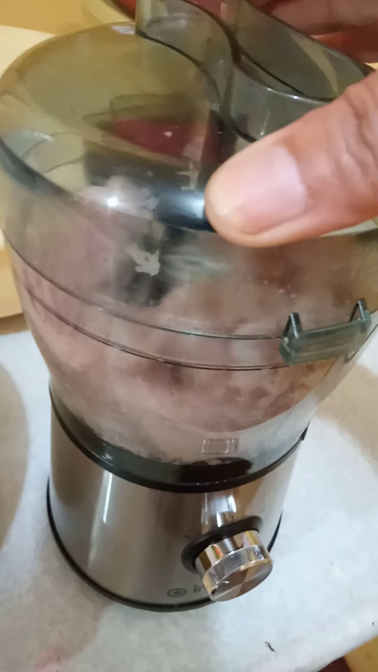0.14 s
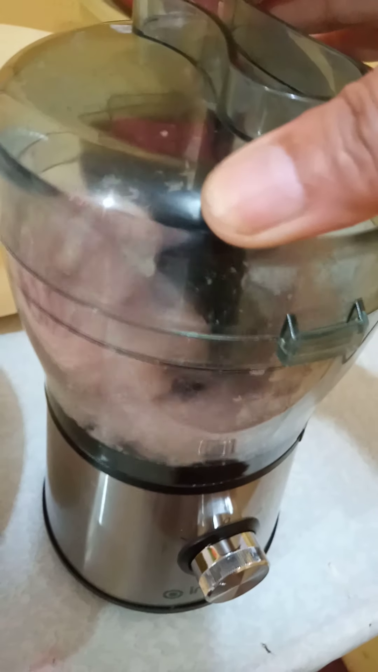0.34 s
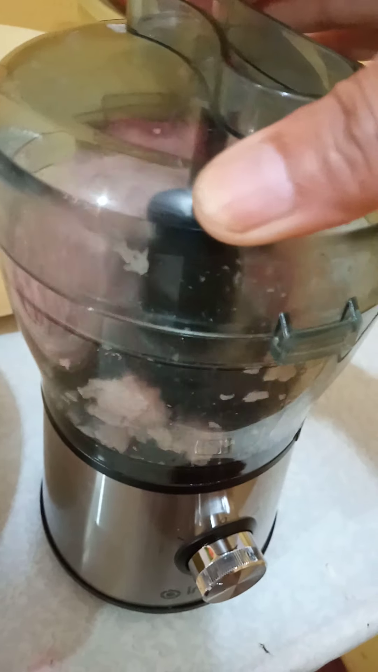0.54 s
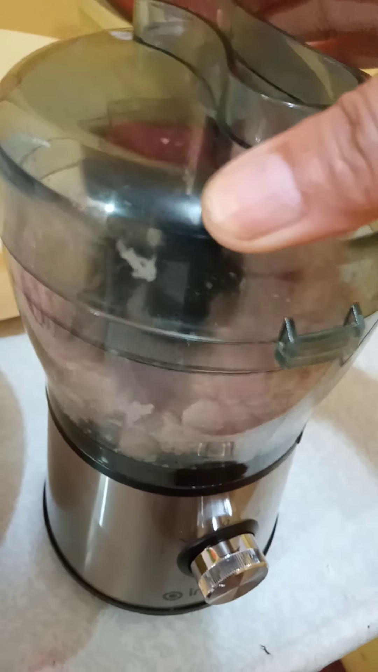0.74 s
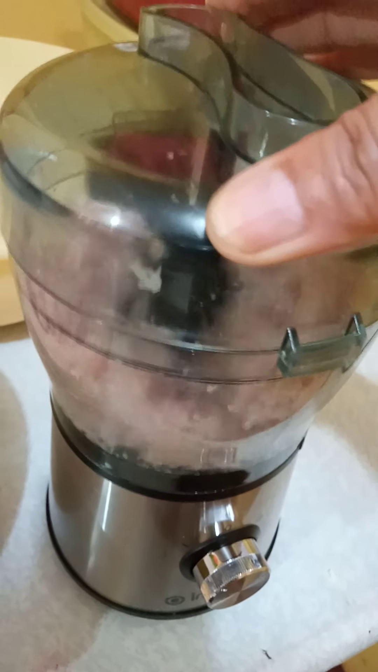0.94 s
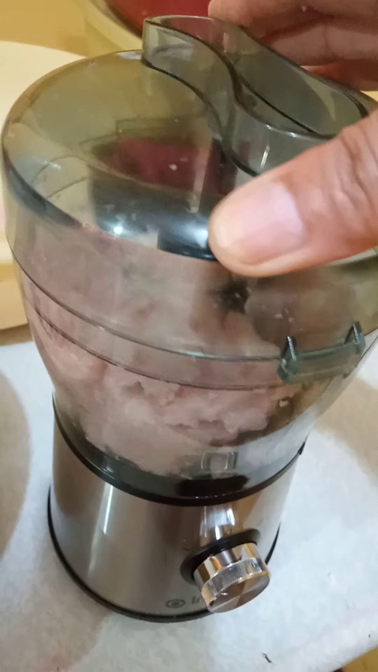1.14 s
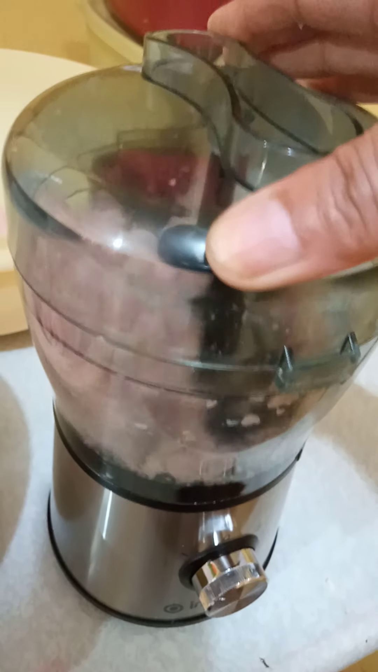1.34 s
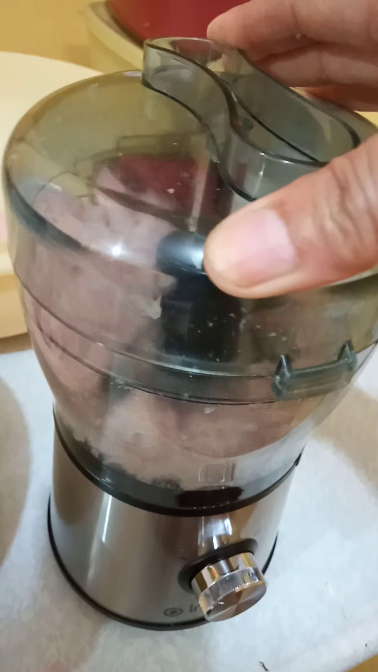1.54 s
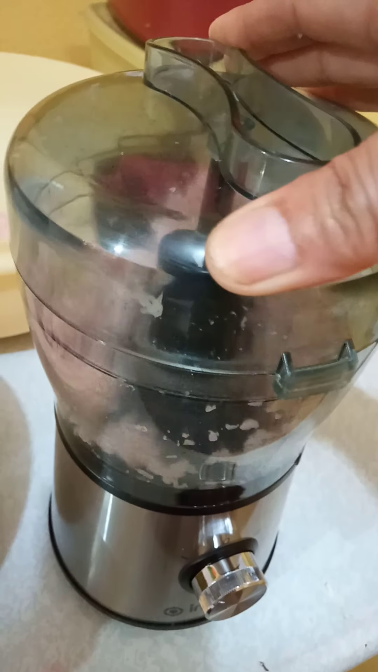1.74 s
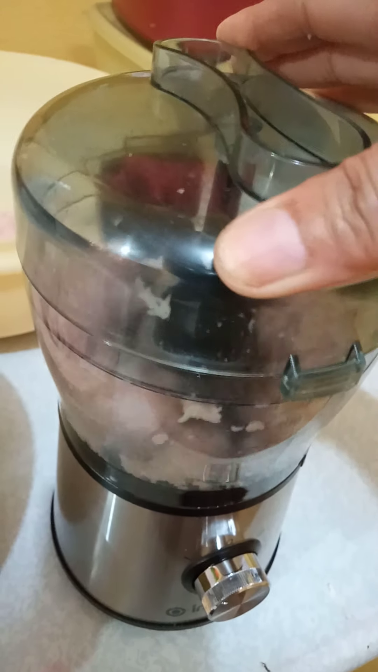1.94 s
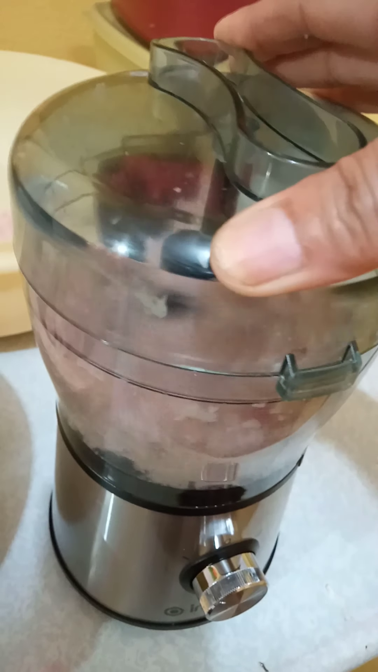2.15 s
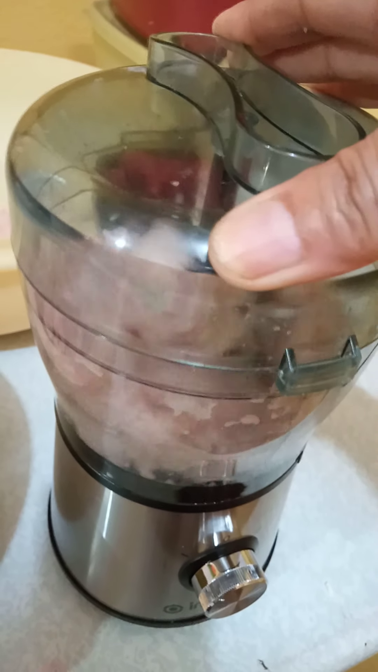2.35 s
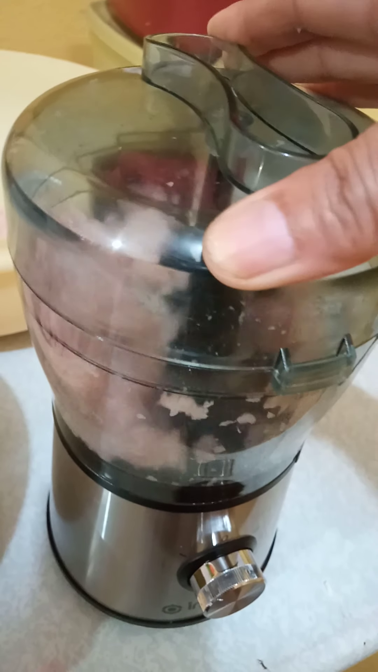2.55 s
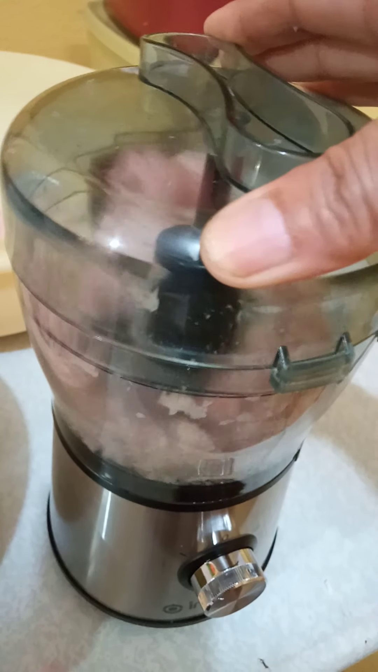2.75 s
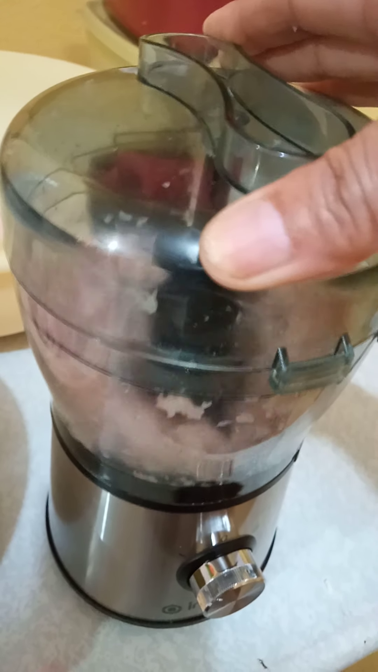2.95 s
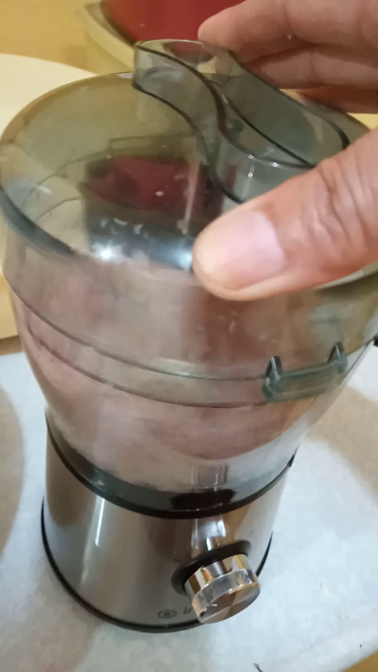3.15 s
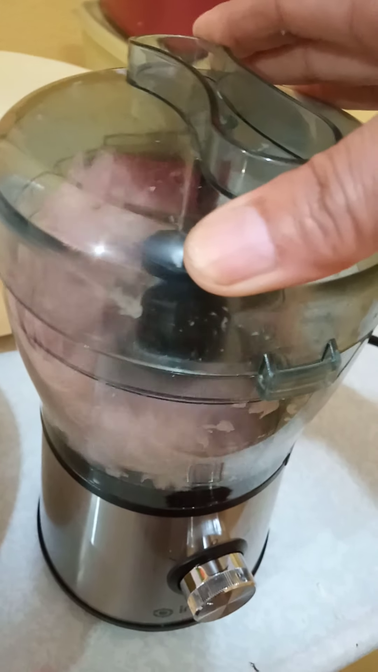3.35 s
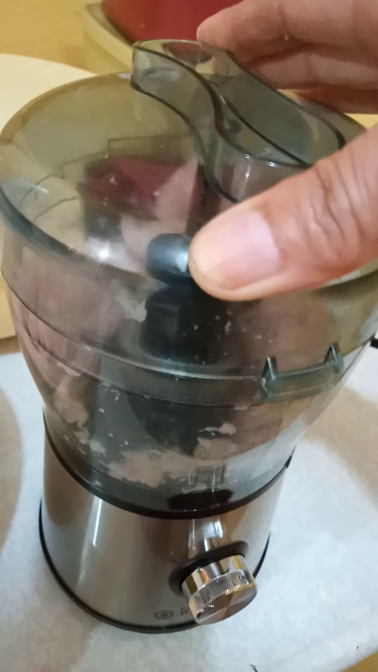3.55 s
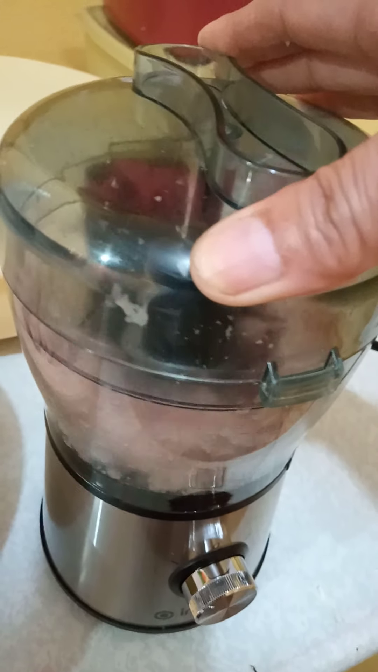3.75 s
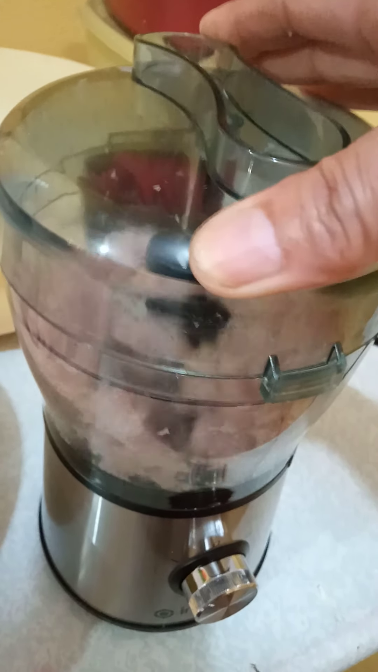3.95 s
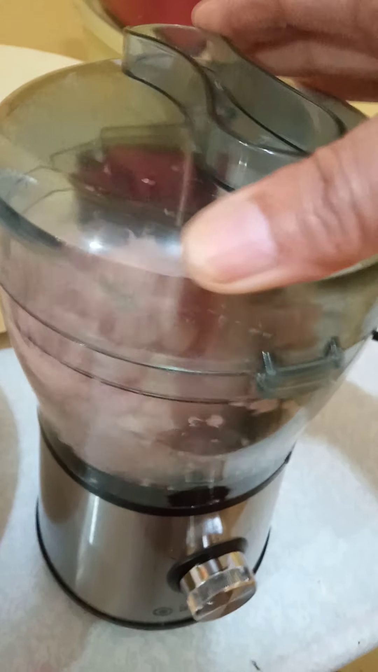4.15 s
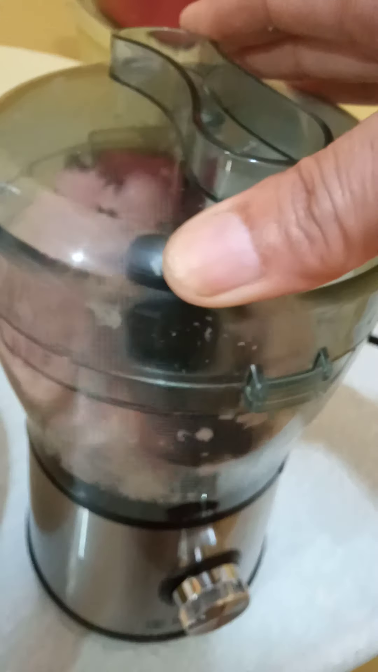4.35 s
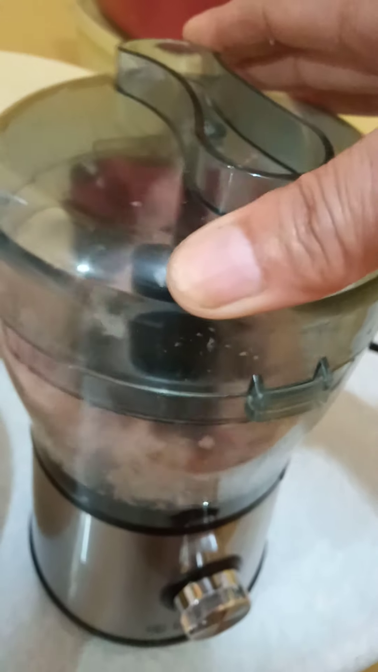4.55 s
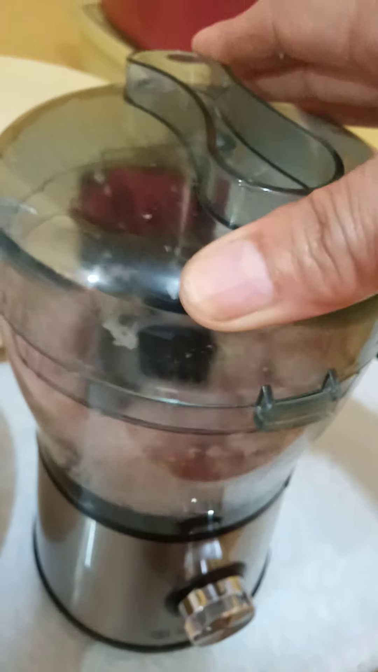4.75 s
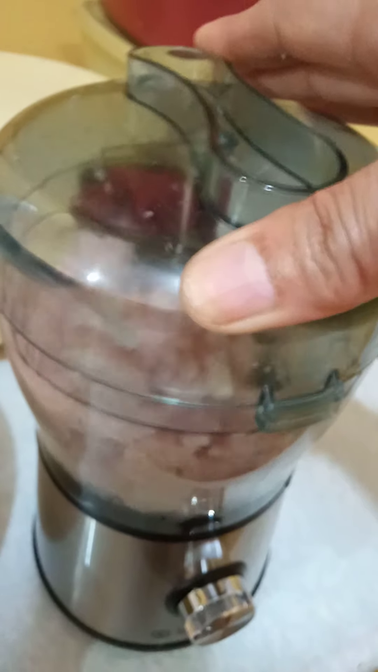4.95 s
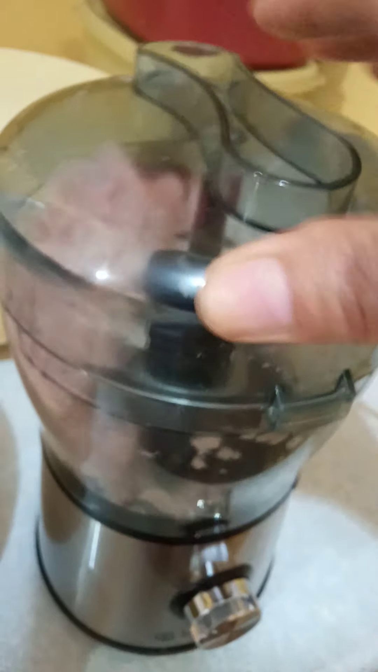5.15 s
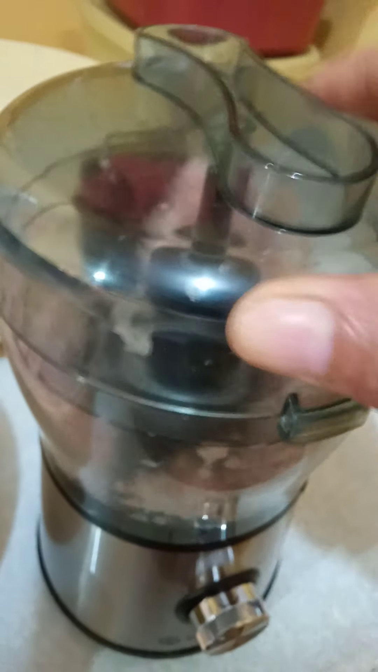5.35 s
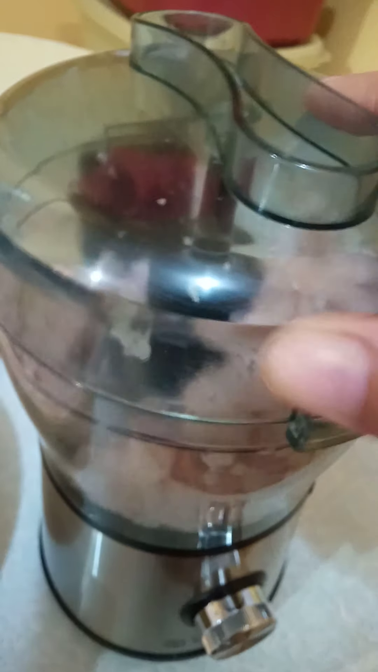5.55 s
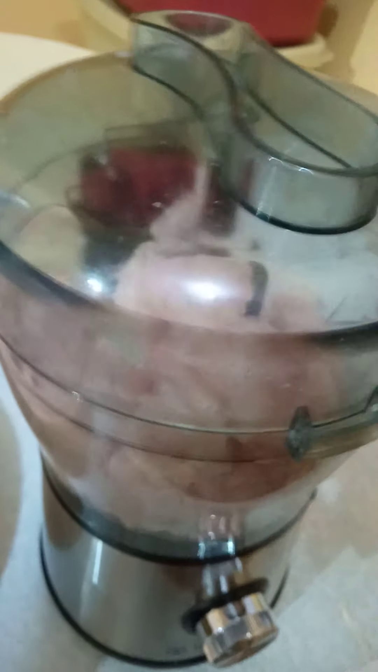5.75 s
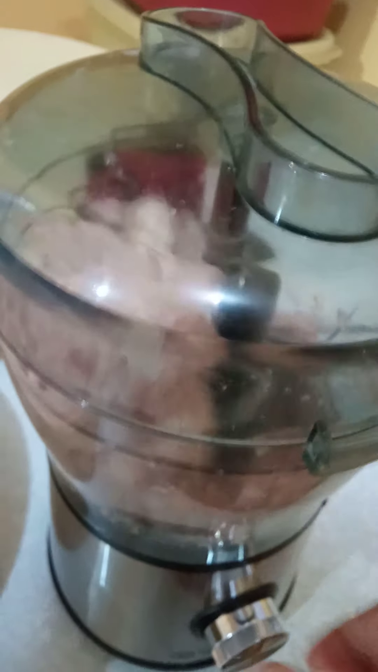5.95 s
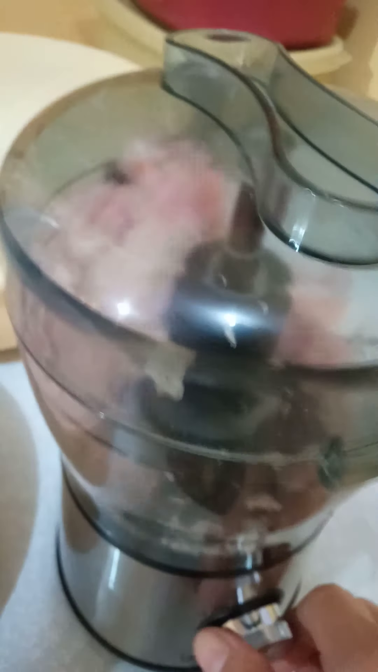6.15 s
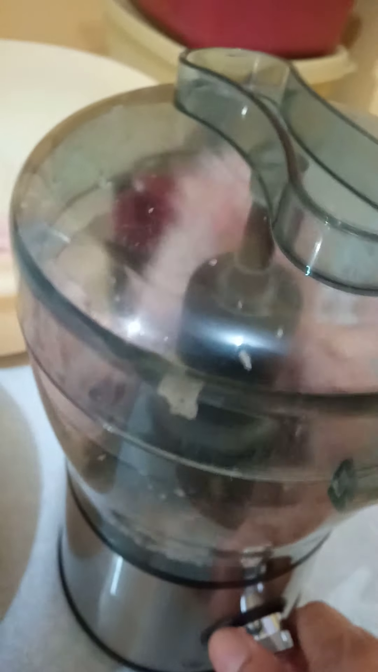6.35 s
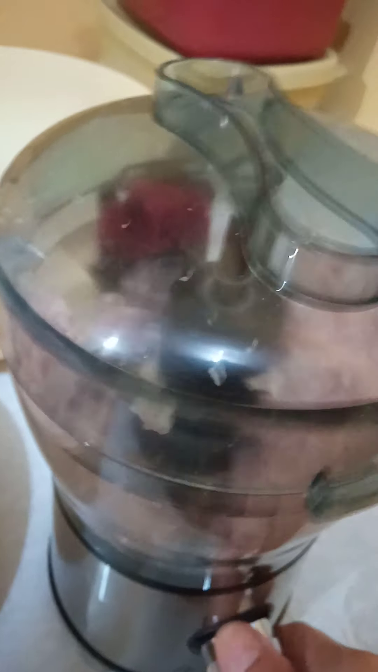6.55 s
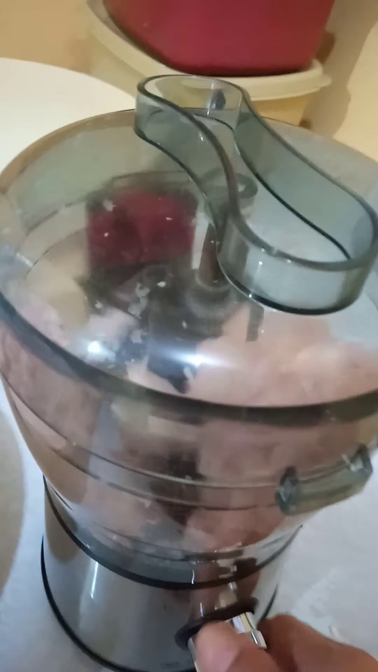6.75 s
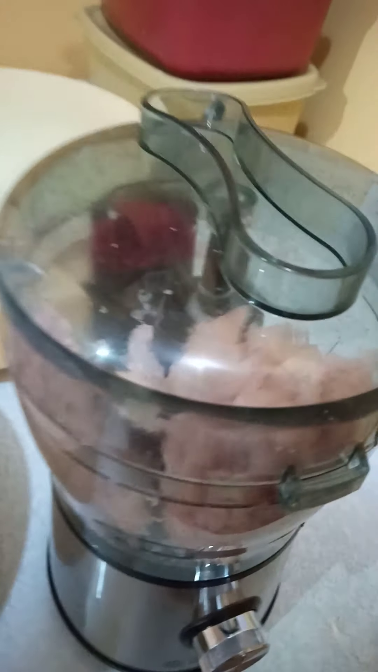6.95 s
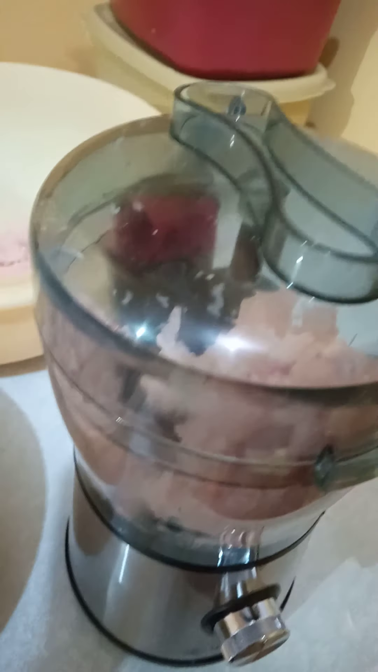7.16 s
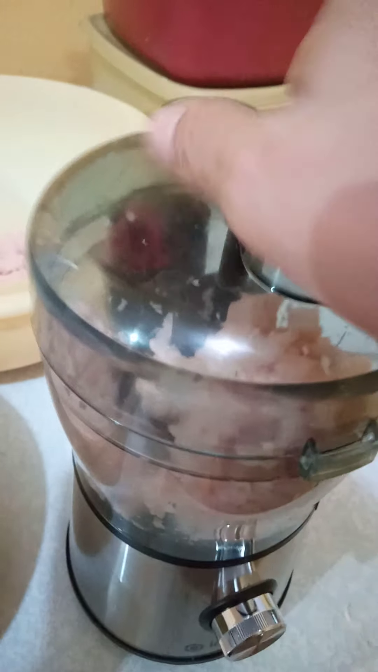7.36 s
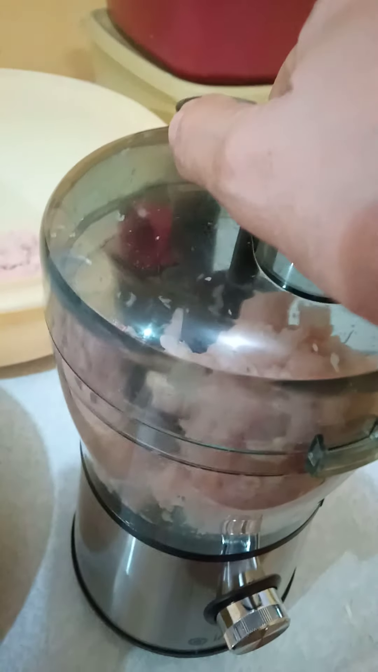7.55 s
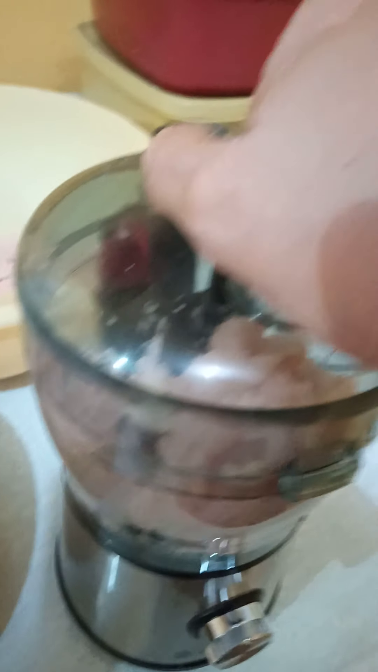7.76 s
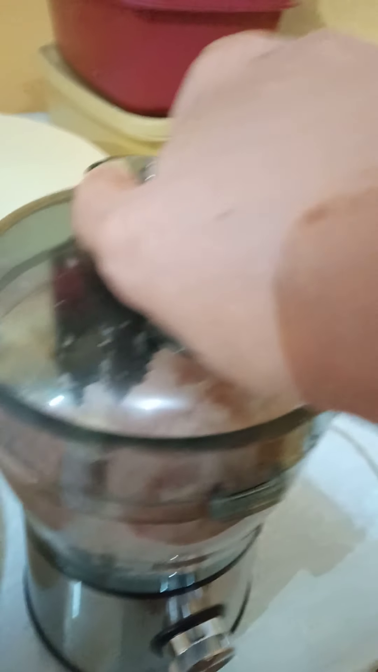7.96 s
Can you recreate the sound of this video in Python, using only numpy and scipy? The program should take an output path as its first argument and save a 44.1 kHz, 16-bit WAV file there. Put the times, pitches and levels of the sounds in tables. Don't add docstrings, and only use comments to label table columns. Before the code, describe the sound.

Harsh, throbbing gear whine of a kitchen mincer chopping raw meat, switched off into a quick falling whirr, then faint finger taps on plastic.

```python
import sys
import numpy as np
from scipy import signal
from scipy.io import wavfile

SR = 44100
rng = np.random.default_rng(int(sys.argv[2]) if len(sys.argv) > 2 else 0)


def volts(x):
    e = np.asarray(x, float) / 20
    return 10 ** e


def persist_wave(psi):
    counts = np.round(np.clip(psi, -1, 1) * 32767).astype(np.int16)
    wavfile.write(sys.argv[1], SR, np.atleast_2d(counts).T)


N = 352344
TIME = np.arange(N) / SR
FULL_HZ = 1820


def noise(count=N):
    return rng.standard_normal(count)


def evened(x):
    return x / np.sqrt(np.mean(abs(x) ** 2) + 1e-20)


def drift(hz):
    b, a = signal.butter(2, hz, fs=SR)
    return evened(signal.lfilter(b, a, noise()))


def curve(points, column=1, **ends):
    columns = np.transpose(points)
    return np.interp(TIME, columns[0], columns[column], **ends)


def add(mix, s, sound):
    part = mix[round(s * SR):][:len(sound)]
    part += sound[:len(part)]


def coloured(x, points, rings=()):
    hz = abs(np.fft.fftfreq(8192, 1 / SR))
    point_hz, point_db = np.transpose(points)
    db = np.interp(np.log(hz + 1), np.log(point_hz + 1), point_db)
    for ring_hz, width_hz, rise_db in rings:
        db = db + rise_db / (1 + (2 * (hz - ring_hz) / width_hz) ** 2)
    log_gain = np.log(volts(np.maximum(db - db.max(), -100)))
    taps = np.fft.ifft(np.exp(np.conj(signal.hilbert(log_gain)))).real[:4096]
    return signal.oaconvolve(x, taps / np.linalg.norm(taps))[:len(x)]


# start_s, tooth_rate_hz, tooth_load_db, bowl_shake_db
POWERED = [(0.0, 1841, 1.5, -0.5), (0.5, 1785, 0, 0), (0.9, 1806, 2, -1), (1.8, 1831, 0, -0.5),
           (2.3, 1800, 0.3, -0.5), (3.3, 1803, -1.5, 0.5), (3.9, 1853, 1.5, .5), (4.2, 1811, 2, .5),
           (4.4, 1844, -0.5, 1), (4.85, 1802, 0, 1), (5.301, 1842, -1.3, 3.5), (5.65, 1787, 3, 1.5),
           (6.0, 1859, -1.5, 3), (6.42, 1893, -6, 3)]
# start_s, tooth_rate_hz, tooth_load_db
COASTING = [
    (6.46, 1760, -3.5),
    (6.52, 1580, -3),
    (6.63, 1215, -4),
    (6.75, 900, -4.5),
    (6.79, 790, -4),
    (6.815, 665, -2),
    (6.85, 615, -6),
    (6.92, 500, -27),
    (7.12, 190, -60),
]


def controls():
    powered_and_coasting = [row[:3] for row in list(POWERED) + list(COASTING)]
    hz, load_db = curve(powered_and_coasting, 1), curve(powered_and_coasting, 2)
    off_s = COASTING[0][0]
    shake_db = curve([(row[0], row[3]) for row in POWERED] + [(off_s, 0.)])
    free = np.interp(TIME, [POWERED[-1][0], COASTING[1][0]], [0., 1.])
    slowing = np.maximum(np.log2(FULL_HZ / hz), 0)
    slack = np.maximum(np.log2(600 / hz), 0)
    whine_db = -16.5 + load_db
    rattle_db = -27 + 0.84 * shake_db - 1.5 * free - 3.5 * slowing - 22 * slack
    churn_db = -39.5 + 1.3 * shake_db - 6 * slowing
    odd_db = -7 + 0.81 * shake_db + 5.5 * free
    return hz, whine_db, rattle_db, churn_db, odd_db


TOOTH_TONES = [6, 2, 5.5, 0.5, -7, -2.5]


def tooth_whine(teeth, turns, speed, throb_db, whine_db, odd_db):
    flare = np.cos(np.pi * turns) ** 8 - .3
    loose = np.interp(TIME, [6.42, 6.5], [.38, .27])
    whine = np.zeros(N)
    for k, db in enumerate(TOOTH_TONES, 1):
        fuzz = drift(50 + 15 * k) + 1j * drift(50 + 15 * k)
        soften = speed ** (1.5 * max(k - 4, 0))
        tone_db = db + k % 2 * odd_db
        if k == 4:
            tone_db = tone_db + 11 * flare
        tone = ((0.48 + loose * fuzz) * np.exp(2j * np.pi * k * teeth)).real
        whine += volts(tone_db) * soften * tone
    return whine * volts(whine_db - 14.5 + 1.25 * throb_db)


def gear_rattle(speed, throb_db, rattle_db):
    rattle = noise() * volts(rattle_db + 6 + 0.26 * throb_db + 1.6 * drift(160))
    brushes = noise() * volts(0.56 * rattle_db - 3.0 + .5 * throb_db + .8 * drift(60)) * speed
    split = signal.butter(4, 5700, fs=SR)
    brush_top = brushes - signal.filtfilt(*split, brushes)
    return signal.filtfilt(*split, rattle) + brush_top


# pitch_hz, level_db (per Hz)
CHURN_COLOUR = [(12, -73.5), (20, -42), (27, -51), (40, -31), (65, -16.5), (96, -6.5), (231, 3.5),
                (323, -3.5), (385, 2), (420, -4), (500, -14), (579, -16.5), (650, -19), (840, -38.5),
                (1430, -120)]


def meat_churn(throb_db, churn_db):
    rumble = noise() * volts(1.1 * throb_db + 1.7 * drift(18))
    return coloured(rumble, CHURN_COLOUR) * volts(churn_db - 0.17)


# start_s, second_tone_peak_db, first_tone_peak_db
HARD_BITS = [(0.1316, -3.5, -29), (0.173, -3, -21.5), (0.2677, -5.5, -11), (0.4643, -6, -13.5),
             (0.518, -5.5, -33.5), (1.264, -5, -34), (1.319, -7.5, -22.5), (1.718, -5.5, -15),
             (1.8643, -4, -12.5), (1.9634, -6, -10.5), (2.2683, -6.5, -37), (2.317, -3.5, -17.5),
             (2.37, -0.5, -13.5), (2.4644, -6, -9.5), (2.519, -7.5, -17), (2.6638, -8.5, -21.5),
             (2.867, -6, -38), (2.921, -4, -13), (3.3212, -6, -40), (3.416, -6, -15), (3.468, -6.5, -17),
             (4.0648, -6, -25), (4.3954, -5, -31.5), (4.497, -5, -11.5), (4.799, -13.5, -39),
             (4.9448, -9.5, -10), (5.0982, -4.5, -20), (5.5838, -4.5, -33), (5.6323, -3, -15.5),
             (6.0332, -6, -15)]
# start_s, turn_length_s, turns (count)
BLADE_TURNS = [
    (0.0185, .04997, 76),
    (3.842, .0499, 50),
]


def bits():
    s = np.concatenate([start + period * np.arange(count) for start, period, count in BLADE_TURNS])
    chance = rng.random(len(s))
    free = abs(s[:, None] - np.transpose(HARD_BITS)[0]).min(1) > .025
    small_s = s + 0.0029 * noise(len(s))
    second_db = np.full(len(s), -9.5)
    first_db = -21 + 5.5 * noise(len(s))
    small_bits = np.transpose([small_s, second_db, first_db])
    return list(HARD_BITS) + list(small_bits[free & (chance < .33)])


def bit_clashes(teeth):
    first, second, load = np.zeros((3, N))
    t = np.arange(900) / SR
    swell = np.exp(-((t - .007) / 0.0035) ** 2)
    for s, second_db, first_db in bits():
        add(first, s - .004, volts(first_db - 7.0) * swell)
        add(second, s - .004, volts(second_db - 2.5) * swell)
        add(load, s - .004, swell)
    clash = first * np.cos(2 * np.pi * teeth) + second * np.cos(2 * 2 * np.pi * teeth)
    return clash, load


# beats_per_turn (count), depth_db, lag_turns (turns)
BLADE_THROB = [(1, 1.8, .1), (2, 1.6, .3), (3, 1.5, .1), (3.75, 1.7, .1), (4, .8, .1), (6, 1, .1)]
# pitch_hz, level_db
HOUSING_COLOUR = [(250, -36), (500, -15), (1240, -9.5), (1340, -4.5), (2000, -5.5), (2550, -7), (3200, 2.5),
                  (3700, 4.5), (4700, -12.5), (4850, -19), (5450, -24), (5750, -27.5), (8500, -39.5),
                  (9800, -53.5), (15600, -63.5)]
# pitch_hz, width_hz, rise_db
HOUSING_RINGS = [(723.7, 82, 9.5), (605, 25, -0.5), (1580, 110, 3.5), (1906, 112, 12), (2240, 110, 8.5),
                 (3150, 96, -3), (4556, 270, 7), (5300, 330, 6), (6250, 230, 5), (8260, 320, 7.5),
                 (9100, 300, 1.5), (11400, 400, 2.5), (13500, 400, 2.5), (14600, 300, 2.5)]


def chopper():
    hz, whine_db, rattle_db, churn_db, odd_db = controls()
    speed = hz / FULL_HZ
    teeth = np.cumsum(hz * (1 + .006 * drift(31.9))) / SR
    turns = teeth / 90
    throb_db = np.zeros(N)
    for beats, depth_db, lag in BLADE_THROB:
        throb_db += depth_db * np.cos(2 * np.pi * beats * (turns - lag) + 0.66 * drift(2.4))
    teeth = teeth + 0.01 * drift(250)
    whine = tooth_whine(teeth, turns, speed, throb_db, whine_db, odd_db)
    rattle = gear_rattle(speed, throb_db, rattle_db)
    churn = meat_churn(throb_db, churn_db)
    clash, load = bit_clashes(teeth)
    whine *= 1 - 0.9 * np.minimum(load, 1)
    on = np.interp(TIME, [7.04, 7.1], [1., 0.])
    return on * (coloured(whine + rattle, HOUSING_COLOUR, HOUSING_RINGS) + churn + clash)


# start_s, level_db
GRIND_LEVEL = [
    (6.86, -16),
    (6.954, -33),
    (7.033, -38.5),
    (7.08, -73),
]
# pitch_hz, level_db (per Hz)
SCRAPE_COLOUR = [(180, -30.5), (300, -7), (390, -20), (599, -10), (878, -8.5), (990, -35.5), (1060, -16.5),
                 (2280, -11.5), (2830, -7.5), (4510, -29), (5200, -37.5), (6760, -67), (11400, -120)]


def grind():
    fade_in_db = np.interp(TIME, [6.86, 6.96], [-20., -2.5])
    level_db = curve(GRIND_LEVEL, left=-120, right=-120) + fade_in_db + 3.0 * drift(90)
    return coloured(volts(level_db) * noise(), SCRAPE_COLOUR)


# start_s, peak_db, thud_db
LUMP_KNOCKS = [(0.557, -18.5, -11), (0.611, -10.5, -7), (0.666, -21, -11), (1.192, -13.5, -9),
               (1.346, -15.5, -9.5), (1.961, -22.5, -13), (3.351, -17.5, -9), (3.564, -14, -12),
               (4.148, -22, -7.5), (4.284, -17, -14.5), (4.478, -15.5, -9.5), (5.178, -10.5, -9.5),
               (5.229, -8.5, -15.5), (5.281, -11, -9), (5.331, -14, -1), (5.383, -19.5, -7.5),
               (5.41, -19.5, -8.5), (5.657, -16, -9), (5.707, -16.5, -14.5), (5.771, -18.5, -15.5),
               (5.898, -28, -6.5), (5.953, -11.5, -7), (6.005, -9.5, -25), (6.0555, -9, -14),
               (6.226, -20, -12.5), (6.155, -9.5, -25), (6.176, -13, -7), (6.204, -15, -9),
               (6.251, -10.5, -10), (6.298, -7.5, -14)]
# pitch_hz, level_db
BOWL_COLOUR = [(30, -34), (120, -0.5), (300, 0.5), (1500, 4), (3000, -19.5), (8000, -54)]


def lumps():
    mix, t = np.zeros(N), np.arange(1300) / SR
    for s, db, thud_db in LUMP_KNOCKS:
        wall_hz = 930 * (1 + .05 * rng.standard_normal())
        swing = np.sin(2 * np.pi * wall_hz * t) * np.exp(-((t - .0012) / 0.00071) ** 2)
        thud = volts(thud_db) * np.sin(2 * np.pi * 260 * t) * np.exp(-t / 0.0068)
        ring = volts(-17) * np.sin(2 * np.pi * 740 * t) * np.exp(-t / 0.021)
        crack = .25 * noise(len(t)) * np.exp(-t / .0015)
        add(mix, s, volts(db - 10.5) * (swing + thud + ring + crack))
    return coloured(mix, BOWL_COLOUR)


# start_s, peak_db
FLECK_SLAPS = [(0.4932, -64.5), (1.193, -62), (1.3475, -61), (2.1429, -50.5), (2.2485, -62.5),
               (2.3426, -59), (3.6913, -54.5), (4.1779, -50), (4.3298, -49.5), (4.4794, -43), (5.131, -45),
               (5.229, -40), (5.2743, -57), (5.6627, -49), (5.7149, -50.5), (5.8121, -57), (5.9554, -49),
               (6.005, -36), (6.056, -44), (6.0945, -46.5), (6.1439, -47.5), (6.2856, -46), (6.3835, -50),
               (6.9432, -57.5)]
# pitch_hz, level_db
FLECK_COLOUR = [(3000, -35), (6000, -8), (7700, 0), (8300, 15), (8900, 0), (10300, -6), (11400, 4),
                (12500, -10), (15500, -16)]


def flecks():
    ticks, t = np.zeros(N), np.arange(1300) / SR
    for s, db in FLECK_SLAPS:
        add(ticks, s, volts(db + 2.5) * noise(len(t)) * np.exp(-t / 0.0028))
    return coloured(ticks, FLECK_COLOUR)


# start_s, peak_db, pitch_hz, low_part_db, bright_part_db
FINGER_TOUCHES = [(7.2952, -38, 2400, -5, -36), (7.2995, -40.5, 3150, -15, -40),
                  (7.4208, -42, 2170, 7, -38), (7.4453, -40.5, 3567, -22, -29),
                  (7.457, -37.5, 3400, -15, -34), (7.4676, -33, 2700, -17, -28.5),
                  (7.475, -30.5, 3200, -13, -28.5), (7.4863, -36, 2590, -13, -33),
                  (7.5346, -31, 2650, -17, -20.5), (7.5503, -40, 1720, -10, -30),
                  (7.5777, -44, 1510, -4, -32), (7.87, -46, 3020, -8, -19), (7.9554, -31, 2900, 4, -39)]
# start_s, pressure_db
PALM_RUB = [
    (7.36, -63),
    (7.444, -46.5),
    (7.482, -46),
    (7.526, -58),
    (7.546, -47.5),
    (7.66, -65),
]
# pitch_hz, level_db
LID_COLOUR = [(400, -15.5), (1000, 3), (1600, 1.5), (2500, 0), (3300, 1), (4600, -9.5), (5200, -22.5),
              (7500, -36.5), (10000, -44.5)]
# pitch_hz, level_db
NAIL_COLOUR = [(4000, -29), (5500, -3), (7000, -2), (9500, -10), (12000, -31.5)]


def hand():
    taps, ticks, tones = np.zeros((3, N))
    t = np.arange(4000) / SR
    crack = 1 + 2.6 * np.exp(-t / 0.0017)
    for s, db, hz, low_db, bright_db in FINGER_TOUCHES:
        fade = volts(db - 60 * t / 0.038)
        add(taps, s, volts(-11) * crack * fade * noise(len(t)))
        add(ticks, s, volts(bright_db - 8) * crack * fade * noise(len(t)))
        high = 0.47 * np.sin(2 * np.pi * hz * t)
        low = volts(low_db - 11.5) * np.sin(2 * np.pi * 420 * t)
        add(tones, s, fade * (high + low))
    press_db = curve(PALM_RUB, left=-120, right=-120)
    hiss = volts(press_db - 8 + 3 * drift(150)) * noise()
    rumble = volts(press_db - 2.5) * noise()
    lid, nail = coloured(taps + hiss, LID_COLOUR), coloured(ticks, NAIL_COLOUR)
    return tones + lid + nail + coloured(rumble, CHURN_COLOUR)


def kitchen(x):
    t = np.arange(SR // 2) / SR
    sparse = rng.choice([-1., 1.], len(t)) * (rng.random(len(t)) < .05)
    echoes = sparse * (t > .004) * volts(-60 * t / 0.38)
    tail = signal.fftconvolve(x, echoes / np.linalg.norm(echoes))[:N]
    return x + volts(-9) * signal.lfilter(*signal.butter(1, 6000, fs=SR), tail)


# pitch_hz, level_db (per Hz)
AIR_COLOUR = [(12, -51.5), (32, -33.5), (45, -12.5), (79, -5.5), (100, -7.5), (418, -14), (608, -20.5),
              (780, -15.5), (870, -22.5), (3120, -25), (4200, -33), (5600, -56), (7000, -47), (8500, -45.5),
              (10000, -61), (15600, -78.5)]
# pitch_hz, level_db (rms)
APPLIANCE_HUM = [(70.0, -58), (419.9, -66.5), (662.1, -61.5), (780.6, -56), (1378, -68.5), (1739, -67),
                 (1857, -77.5), (2218, -69.5), (2460, -76), (2643, -73)]


def room_tone():
    air = evened(coloured(noise() * volts(1.0 * drift(12)), AIR_COLOUR)) * volts(-45.5 - 6.0)
    hum = np.zeros(N)
    for hz, db in APPLIANCE_HUM:
        cycles = hz * TIME + 0.034 * drift(13)
        hum += np.sqrt(2) * volts(db + 0.5 * drift(4.1)) * np.sin(2 * np.pi * cycles)
    return air + hum


def scene():
    close = chopper() + grind() + lumps() + flecks() + hand()
    return (kitchen(close) + room_tone())[None]


def roll_off(x):
    return signal.sosfilt(signal.butter(12, 15500, fs=SR, output="sos"), x)


def record(dry):
    size = abs(dry)
    rounded = np.sign(dry) * (.78 + .2 * np.tanh((size - .78) / .2))
    return roll_off(np.where(size > .78, rounded, dry))


dry = scene()
out = record(dry)
persist_wave(out)
```